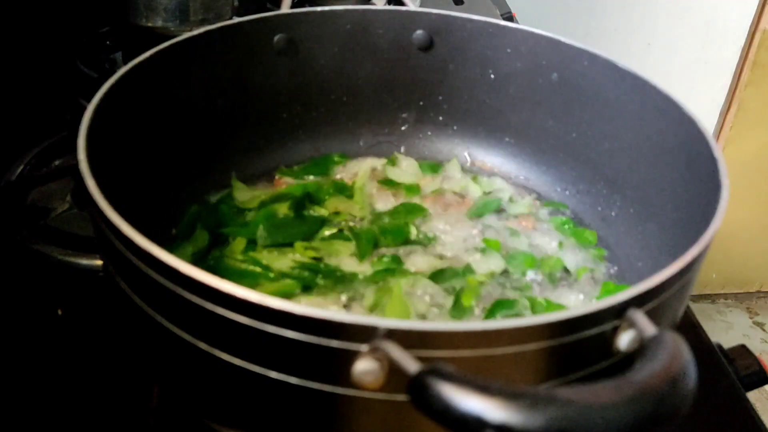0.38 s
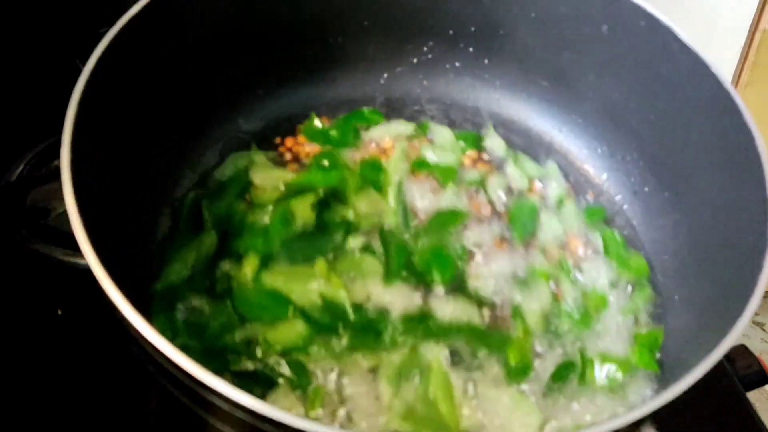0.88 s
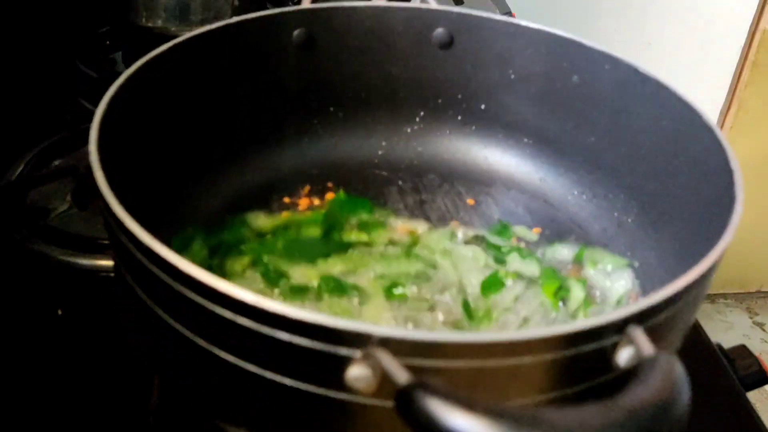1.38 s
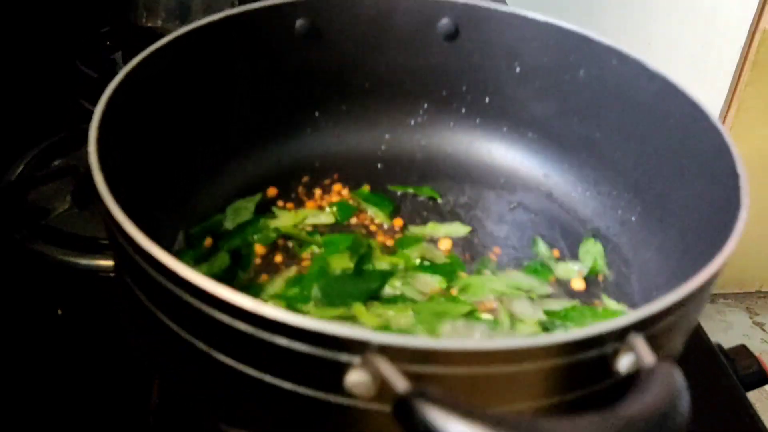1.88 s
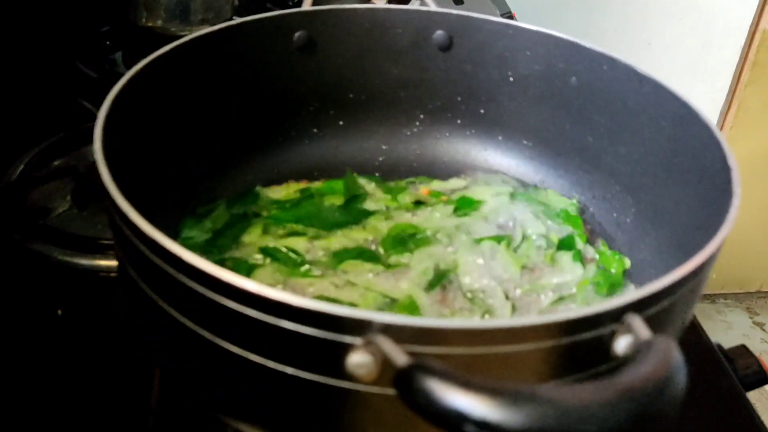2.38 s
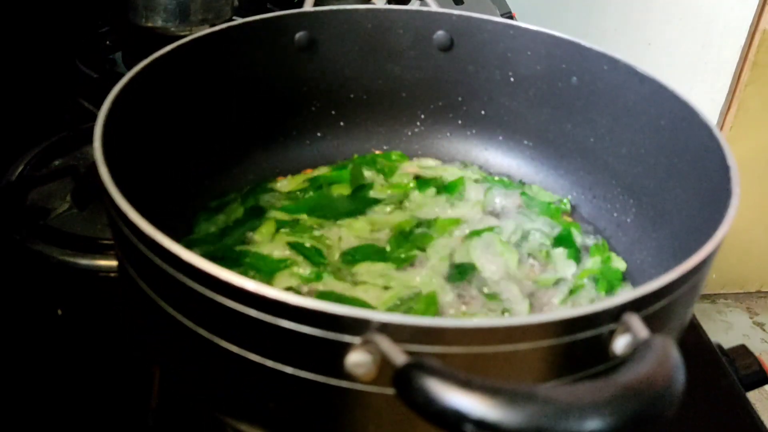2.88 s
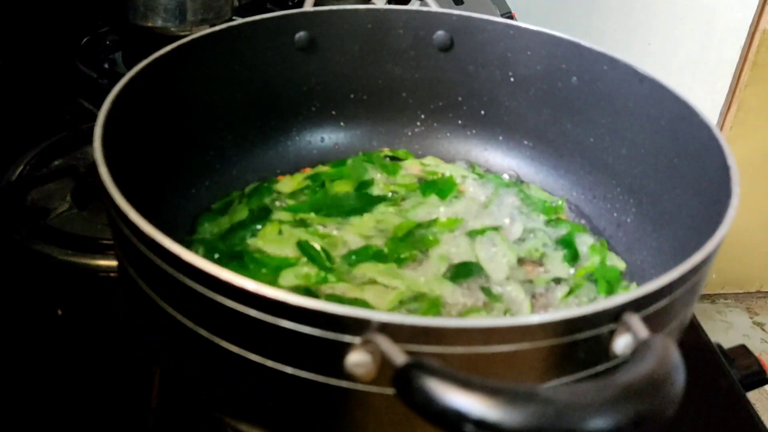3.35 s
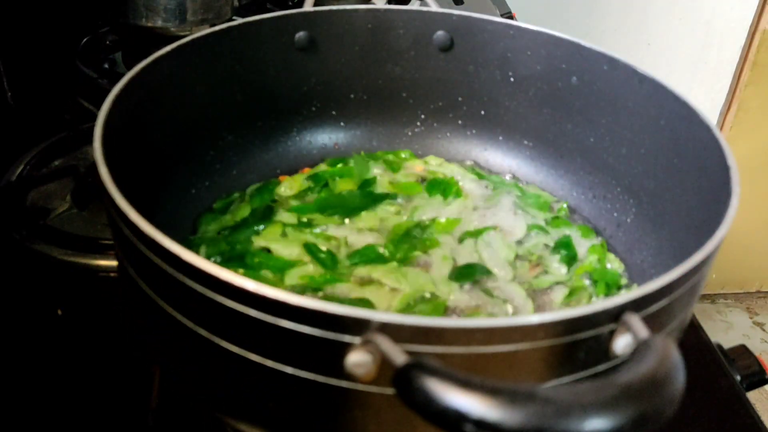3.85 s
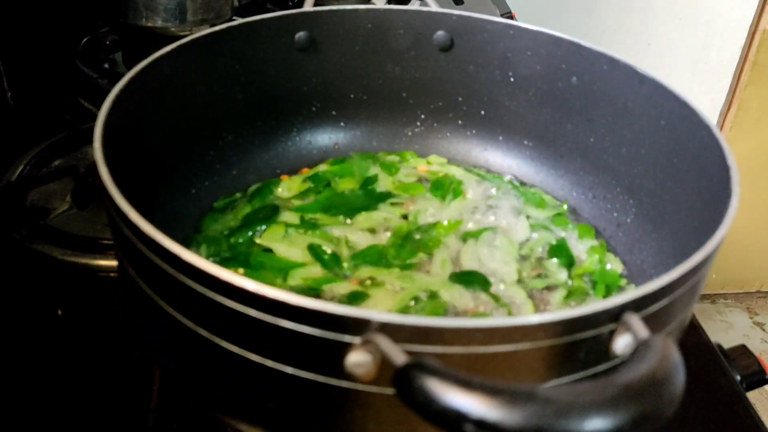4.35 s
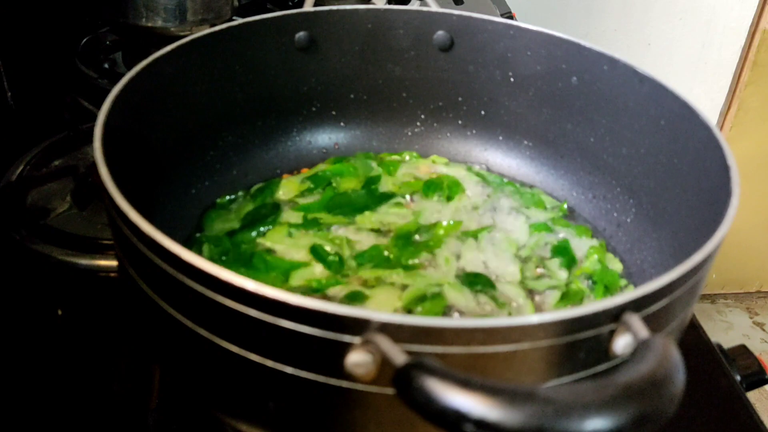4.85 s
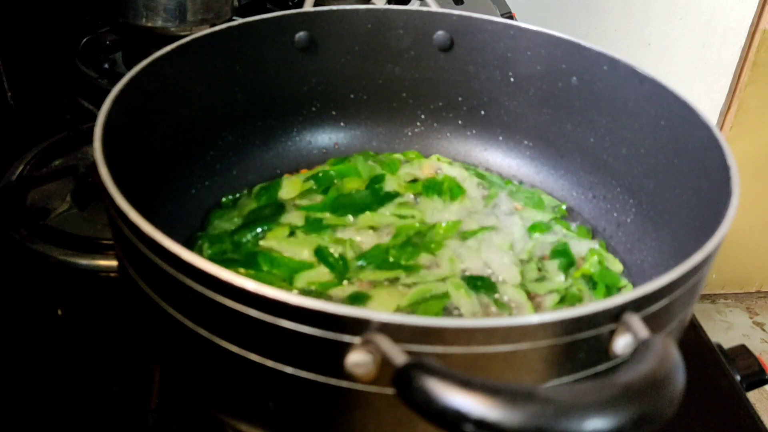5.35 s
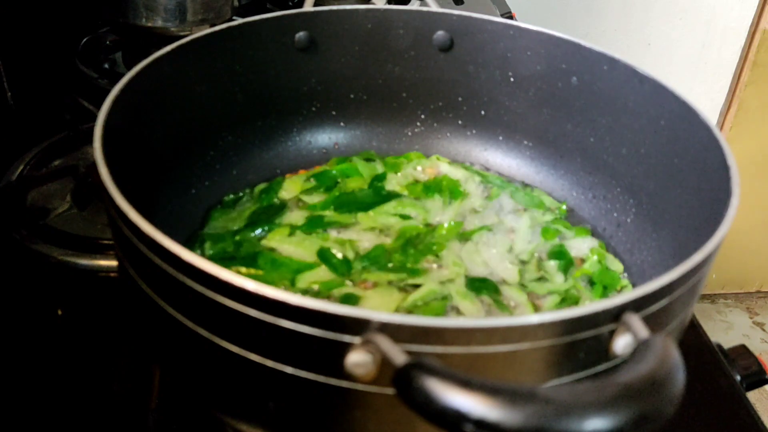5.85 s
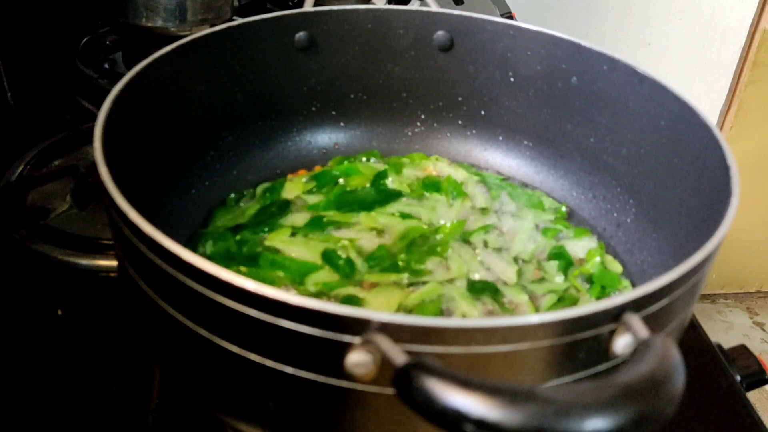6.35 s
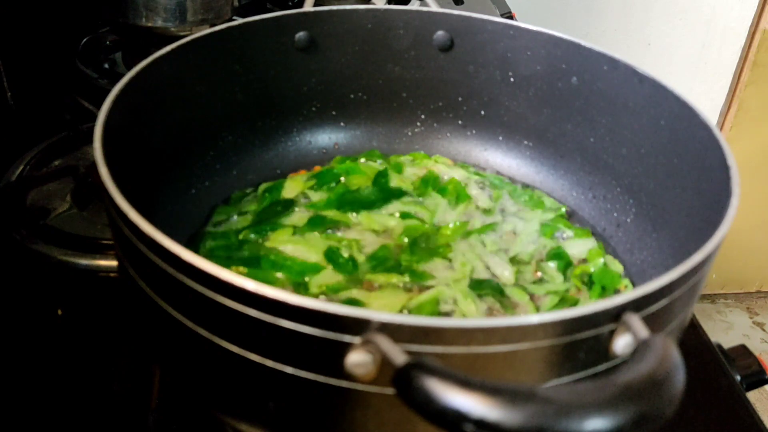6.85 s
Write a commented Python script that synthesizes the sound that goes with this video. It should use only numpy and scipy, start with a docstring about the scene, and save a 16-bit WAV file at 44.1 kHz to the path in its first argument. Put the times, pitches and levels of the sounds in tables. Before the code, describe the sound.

Close, bright frying hiss full of snapping water pops, flaring as a pan of leaves is shaken, later easing with several hard metallic stove-top knocks.

```python
"""Leaves fry in hot oil in a deep metal pan in a kitchen, heard close by on a two-port microphone. The sizzle
is dense clicks of steam, coloured by the microphone; its level wavers unevenly from band to band. Bubbles,
plops, water pops and oil ticks are short rings with diffuse tails; shaken leaves rustle. Knocks and drags
excite decaying modes of the stove top. Under it all lies a low murmur, noise from burner and room, nearly alike
at both ports between 80 and 200 Hz."""
import sys
import numpy as np
from scipy import signal
from scipy.fft import irfft
from scipy.io import wavfile
from scipy.ndimage import uniform_filter1d

SR = 44100
rng = np.random.default_rng(int(sys.argv[2]) if len(sys.argv) > 2 else 0)


def to_wav(s):
    """Save 16-bit WAV."""
    ch = np.atleast_2d(s).T  # columns
    pcm = np.round(np.clip(ch, -1, 1) * 32767)  # PCM
    wavfile.write(sys.argv[1], SR, pcm.astype(np.int16))


def decibels_to_gain(level_db):
    """Convert a level in decibels to a linear amplitude gain (20 dB per decade)."""
    exponent = np.asarray(level_db, float) / 20
    return 10 ** exponent


N = 318843  # samples

# Spectrum of the room murmur. Each row: frequency in Hz, relative level in dB.
MURMUR_SPECTRUM = [(12, -39), (20, 3), (54, -7.5), (96, 3.5), (129, -5.5), (166, 7), (215, 0), (335, 0.5),
                   (381, -3), (507, -1), (558, -22), (900, 0), (1170, -49), (1980, -120)]
MURMUR_DB = -48  # rms
# How alike the murmur is at the two ports. Each row: frequency in Hz, likeness from 0 to 1.
MURMUR_LIKENESS = [(30, 0.53), (80, 1), (200, 1), (450, 0.68), (900, 0.47)]

# Modes of the stove top. Each row: frequency in Hz before a small random shift, relative level in dB,
# time to fall 60 dB in seconds before it is held within 0.05 to 0.3.
STOVE_MODES = [(156, -18, 0.61), (207.8, -17, 0.28), (300.6, -18.5, 0.21), (332.2, -11.5, 0.15),
               (436, -10.5, 0.21), (475, -24, 0.16), (512, -17, .3), (525, -9, .3), (582, -15, 0.15),
               (625, -12, .3), (685, -3, 0.19), (778, -3.5, 0.11), (870, -1, 0.059), (1110, -3, 0.05),
               (1150, -15, 0.25), (1175, -4, 0.077)]
MODE_SHIFT = 0.024  # random part of the frequency: the modes shift with where the pan presses
STOVE_LOW_HZ = 133  # the stove top radiates little below this
# Knocks on the stove top. Each row: time in seconds, peak in dB ahead of the low cut and room,
# centre of the blow in Hz, contact length in cycles.
KNOCKS = [(.242, -25.5, 940, 5), (.299, -23.5, 860, 3.5), (0.955, -18, 393, 2), (.966, -33, 700, 1.5),
          (1.584, -29, 604, 2.7), (1.707, -16.5, 333, 1.13), (1.73, -27, 710, 4.5), (2.047, -20, 830, 3.9),
          (2.156, -22, 990, 1.3), (2.161, -19.5, 805, 3.1), (3.83, -23.5, 199, 1.2), (3.859, -30, 162, 5.1),
          (4.26, -31.5, 175, 3.5), (4.622, -28, 450, 4.8), (4.63, -19.5, 280, 4.4),
          (4.815, -18.5, 285, 4.6), (4.887, -13, 260, 2.4), (4.892, -18, 278, 4.4), (4.895, -17, 564, 13.6),
          (5.451, -19.5, 286, 5.6), (5.462, -23, 650, 3), (5.557, -30.5, 340, 10), (5.58, -10.5, 462, 11.4),
          (5.595, -2.5, 535, 1.55), (5.605, -10.5, 448, 12.7), (5.908, -19.5, 704, 1.76)]
BREADTH_OCTAVES, BREADTH_FALL = 2.47, 0.3  # a longer contact excites a narrower band
CLATTER_UP = 0.41  # reach above the blow, as a share of the reach below it
# Drags over the stove top. Each row: start in seconds, length in seconds, start level in dB,
# end level in dB, centre in Hz, which sets the share of low and high modes.
DRAGS = [(1.562, 0.092, -47, -51, 600), (0.98, 0.095, -31, -44.5, 330), (1.723, 0.13, -36, -45, 320),
         (4.769, 0.16, -31.5, -25.5, 217), (4.902, 0.12, -36, -42, 260), (5.022, 0.12, -32, -49, 150),
         (5.625, 0.15, -23.5, -42, 320), (5.62, 0.35, -41, -41.5, 150), (5.842, 0.082, -39, -46, 430)]

# Wet leaves sliding over the shaken pan. Each row: start in seconds, length in seconds,
# start level in dB, end level in dB, centre in Hz.
RUSTLES = [(.24, 0.091, -40, -32, 940), (0.947, 0.091, -32, -43, 895), (1.555, 0.13, -39, -37, 1320),
           (1.703, 0.1, -26, -42, 1120), (2.035, 0.1, -38, -37, 1270), (2.142, .13, -28.5, -56, 955)]
RUSTLE_OCTAVES = 0.81  # either side of the centre
# Oil spitting against the pan wall. Each row: time in seconds, peak in dB ahead of the tail, ring in Hz.
TICKS = [(.77, -21, 1500), (.968, -17, 1250), (1.586, -12, 1510), (1.741, -25, 1500), (1.758, -15, 1400),
         (2.137, -12, 2400), (3.465, -11, 2390), (3.679, -22, 2360), (4.131, -23, 1300), (4.261, -19, 2060),
         (4.455, -19, 2430), (4.886, -14, 1650), (5.1, -19, 1890), (5.311, -22, 2230), (5.345, -23, 2340),
         (5.412, -20, 1300), (5.525, -23, 2370), (5.551, -27, 2040), (5.782, -29, 1890),
         (5.82, -22.5, 1840), (5.907, -14.5, 2750), (6.191, -24, 1920), (6.36, -22, 2390),
         (6.594, -23, 1980), (6.643, -18.5, 1660), (6.711, -12.5, 1800), (6.79, -18.5, 2960),
         (6.906, -15.5, 1290), (7.003, -20, 2660), (7.194, -26, 1280)]
TICK_CYCLES = 5.7  # to fall 60 dB
# Large bubbles. Each row: time in seconds, level of the ring in dB, starting pitch in Hz.
PLOPS = [(0.815, -18.5, 1470), (0.879, -24, 1260), (0.9153, -23.5, 1490), (0.954, -22, 1220),
         (.985, -26, 1500), (1.002, -21, 2230), (1.128, -23, 2480), (1.168, -22, 2380),
         (1.311, -20.5, 2400), (1.42, -16, 2420), (1.5627, -17.5, 1300), (1.571, -17, 1350),
         (1.706, -16, 1195), (1.714, -14, 1660), (2.032, -24, 1550), (2.047, -13, 2260), (2.108, -20, 2440),
         (2.205, -25, 2560), (2.293, -24, 2470), (2.38, -17.5, 2370), (2.488, -16, 2370),
         (2.6075, -29, 2400), (2.9092, -19.5, 2350), (2.9711, -21, 2240), (5.1624, -22, 2300),
         (5.46, -27, 1840), (6.714, -31, 1870)]
PLOP_CYCLES, PLOP_SNAP_DB = 13, 0  # cycles to fall 60 dB; snap of the breaking film against the ring

# Drops of water bursting. Each row: time in seconds, peak in dB before panning, echoes and tail,
# ring in Hz, left minus right in dB.
POPS = [(0.0348, -5.5, 8560, -8), (0.156, -12, 7820, 0), (.162, -16, 7900, -4), (.17, -10, 7800, -4),
        (.209, -9, 7950, -1), (0.25, -7, 8030, -3.0), (.343, -21, 8000, -4), (0.537, -15, 8050, -4),
        (.625, -6, 7800, -15.5), (0.9288, -22, 7960, -4.5), (0.9567, -7.5, 8300, -8), (1.231, -9, 7360, -6),
        (1.239, -5.5, 8100, -10), (1.343, -20, 7770, -7), (1.498, -2, 7740, -1), (1.556, -21, 7800, -4),
        (1.612, -11, 8300, 9), (1.614, -8, 8900, 4), (1.651, -17, 7800, -4), (1.6796, -17, 7650, -4.0),
        (1.704, -3.5, 8140, -7), (1.8158, -12, 7660, -3), (1.8282, -9, 7800, -8), (2.0821, -3, 7600, -9),
        (2.1051, -8, 7790, 0), (2.231, -5, 7800, -7), (2.2752, -2, 7870, -7), (2.4773, -7, 8140, 10),
        (2.5146, -12, 7650, -2), (2.609, -19, 7540, -3.5), (2.754, -7, 7660, 1), (2.8094, -8, 7520, -2.0),
        (2.8938, -7, 8000, -5.5), (3.151, -2.5, 7900, -5), (3.2904, -11, 7750, -8), (3.36, -15, 7190, -9),
        (3.4515, -9.5, 8100, -5.0), (3.5505, -5, 7900, -3.0), (3.7953, -21, 8000, -2),
        (3.8097, -4.5, 8000, -8), (3.815, -10, 8000, -4), (3.819, -9, 7900, -4), (3.824, -11, 8100, -4),
        (3.882, -12, 7900, -4.5), (3.9028, -1.5, 8000, 1), (3.95, -16, 7790, -8), (4.0485, -1.5, 7400, -1),
        (4.223, -13, 8300, -1.5), (4.239, -6.5, 8050, -4), (4.3984, -16, 7670, -2), (4.43, -15, 7760, -4),
        (4.5172, -5.5, 7940, -6), (4.589, -11, 8300, -2), (4.7547, -20, 7720, -4), (4.879, -4, 7600, -10),
        (4.9742, -12, 8000, -8), (5.3488, -11, 7900, -8), (5.381, -11, 7240, -13), (5.5903, -9, 7400, -11),
        (5.7793, -19, 7970, -13), (5.793, -16, 7800, -13), (5.908, -11, 7300, -12),
        (5.9893, -14.5, 7400, -12), (6.134, -12.5, 7600, -8), (6.1629, -13, 7640, -13),
        (6.6444, -26, 8120, -5), (6.747, -16.5, 7900, -16), (6.8454, -20, 8640, -5),
        (6.979, -17, 7300, -13), (6.994, -11.5, 7400, -11)]
# Echoes off the pan wall. Each row: delay in seconds, level in dB.
PAN_ECHOES = [(.0019, -35), (.0031, -33)]
SPUTTER_S, SPUTTER_DB = 0.0043, -18  # spread in time of the smaller bursts after a pop; their level
CRACK_DB = -24  # sharpest edge of a pop, against its ring
SPLASH_S, SPLASH_DB = 0.0011, -11  # time scale and level of the fine spray around a pop

# Course of the frying: it flares when shaken, then dies down.
# Each row: time in seconds, mean sizzle level in dB, mean bubbling level in dB.
FRY = [(0.0, -24, -37), (0.5, -21.5, -39), (0.9, -23, -39), (1.3, -22, -47), (1.55, -19, -41),
       (1.8, -23, -34), (2.05, -22.5, -34), (2.3, -22.5, -33), (2.55, -23.5, -33.5), (3.15, -24, -38),
       (3.9, -26, -40), (4.6, -26.5, -42.5), (5.2, -28.5, -43.5), (5.7, -28, -38.5), (6.2, -29.5, -47.5),
       (6.7, -30, -41.5), (7.23, -30, -49)]
PAN_HZ, PAN_BUBBLES_DB = 2350, 18.5  # bubbles near the pan's hollow ring sound louder
BUBBLES_SURGE_DB = 0.5  # slow surges of the bubbling, rms
# Sizzle as the microphone colours it. Each row: frequency in Hz, relative level in dB per Hz.
SIZZLE = [(300, -29), (520, -10.5), (1000, -10.5), (1300, -8), (1900, -7.5), (2350, -5), (2900, -6),
          (3400, -7), (4600, -9), (6000, -6), (6800, -3.5), (7500, 4.5), (8500, 2.5), (9300, -7),
          (10100, -19.5), (12500, -26.5), (15600, -28.5), (16100, -50)]
# Tilt of the sizzle between the ports. Each row: frequency in Hz, left minus right in dB.
LEAN = [(400, 5), (1200, 1), (3300, -0.5), (5500, -4), (7500, -7), (9000, 2), (11000, -0.5), (15000, -2)]
FLURRY_S, FLURRY_DB = 0.0028, 1.5  # time scale and energy of a flurry, against its sharpest click
# Uneven level of the hiss, wavering from band to band over time. Each row: frequency in Hz, rms depth in dB.
PATCHY = [(800, 2), (2300, 3), (4500, 4.5), (6200, 4), (7800, 0.5), (9200, 4), (10500, 5), (15000, 4)]


def evened(x):
    """Scales to rms 1."""
    return x / np.sqrt(np.mean(x ** 2) + 1e-20)


def read(points, hz):
    """Reads a spectrum on a log-frequency axis."""
    f, value = np.transpose(points)
    return np.interp(np.log(hz + 1), np.log(f + 1), value)


def curve(rows, column):
    """One column of a table, sample by sample."""
    rows = np.array(rows)
    return np.interp(np.arange(N) / SR, rows[:, 0], rows[:, column])


def add(mix, s, sound):
    """Mixes a sound in at time s, in place."""
    part = mix[..., max(round(s * SR), 0):][..., :sound.shape[-1]]
    part += sound[..., :part.shape[-1]]


def wander(per_s):
    """Slow random curve of rms 1 with per_s independent points a second."""
    count = int(N / SR * per_s) + 2
    return evened(signal.resample(rng.standard_normal(count), N))


def sparks(per_s, spread_db, size=N):
    """Clicks of either sign at random moments; most small, a few large."""
    when, big = rng.random((2, size))
    hit = 2 * abs(when - .5) < per_s / SR
    size_db = spread_db * np.minimum(-np.log(big[hit] + 1e-12), 5)
    out = np.zeros(size)
    out[hit] = np.sign(when[hit] - .5) * decibels_to_gain(size_db)
    return out


def ports(sound, pan_db, lag=5):
    """The left port hears the pan lag samples later; pan_db is left minus right."""
    gap = np.zeros(lag)
    both = np.array([np.r_[gap, sound], np.r_[sound, gap]])
    return both * decibels_to_gain(np.array([[pan_db / 2], [-pan_db / 2]]))


def burst(hz, rise_s, t60, glide):
    """A short ring with a soft start and a pitch gliding up by twice the glide share, peak 1."""
    t = np.arange(round(t60 * SR) + 8) / SR
    envelope = (1 - np.exp(-(t / rise_s) ** 2)) * decibels_to_gain(-60 * t / t60)
    ring = envelope * np.sin(2 * np.pi * hz * t * (1 + glide * t / t60))
    return ring / abs(ring).max()


def walls(x, t60, wet_db):
    """Adds a diffuse tail of sparse taps, different at each port, from 2 ms on."""
    t = np.arange(round(t60 * SR)) / SR
    taps = rng.choice([-1., 1.], (2, len(t))) * (rng.random((2, len(t))) < .1)
    tail = taps * decibels_to_gain(-60 * t / t60) * (t > .002)
    tail /= np.linalg.norm(tail, axis=1, keepdims=True)
    return x + decibels_to_gain(wet_db) * signal.oaconvolve(x, tail, axes=1)[:, :N]


def shaped(x, db):
    """Colours both ports by dB gains given on 1025 bins each, without delay."""
    taps = np.fft.fftshift(irfft(decibels_to_gain(db), axis=1), axes=1) * signal.windows.hann(2048)
    return signal.oaconvolve(x, taps, "same", axes=1)


def octave_band(order, hz, down, up):
    """Band-pass filter reaching so many octaves down and up from hz."""
    return signal.butter(order, hz * 2. ** np.array([-down, up]), "bandpass", fs=SR, output="sos")


def kitchen():
    """Low murmur of burner and room: noise of partly shared phase at the ports, drifting in patches."""
    hz = np.fft.rfftfreq(2048, 1 / SR)
    a, b, c, d, patches = rng.standard_normal((N // 512 + 5, len(hz), 5)).T
    patches = evened(uniform_filter1d(uniform_filter1d(patches, 8, 0), 8, 1))
    same = np.clip(read(MURMUR_LIKENESS, hz), -1, 1)[:, None]
    left, other = a + 1j * b, c + 1j * d
    z = np.array([left, same * left + np.sqrt(1 - same ** 2) * other])
    z *= decibels_to_gain(read(MURMUR_SPECTRUM, hz)[:, None] + 2.6 * patches)
    murmur = signal.istft(z, nperseg=2048, noverlap=1536)[1][:, :N]
    return decibels_to_gain(MURMUR_DB) * evened(murmur)


def stove_ring(centre_hz, octaves):
    """The decaying modes of the stove top, favoured near the centre of the blow."""
    hz, db, t60 = np.transpose(STOVE_MODES)[:, :, None]
    hz = hz * (1 + MODE_SHIFT * rng.standard_normal(hz.shape))
    t = np.arange(SR // 3) / SR
    near_db = -6 * (np.log2(hz / centre_hz) / octaves) ** 2
    decay_db = -60 * t / np.clip(t60, .05, .3)
    return (decibels_to_gain(db + near_db + decay_db) * np.sin(2 * np.pi * hz * t)).sum(0)


def knocks():
    """A push of some milliseconds sets the stove top ringing and clatters on briefly."""
    out, t = np.zeros(N), np.arange(6000) / SR
    for s, db, hz, cycles in KNOCKS:
        contact_s, octaves = cycles / hz, BREADTH_OCTAVES * cycles ** -BREADTH_FALL
        push = signal.windows.hann(max(round(contact_s * SR), 8))
        thud = push * np.sin(2 * np.pi * hz * t[:len(push)])
        knock = signal.fftconvolve(thud, stove_ring(hz, octaves))
        knock = knock / abs(knock).max()
        band = octave_band(3, hz, octaves, CLATTER_UP * octaves)
        rough = evened(signal.sosfilt(band, rng.standard_normal(len(t))))
        clatter = rough * (1 - np.exp(-2 * t / contact_s)) * decibels_to_gain(-60 * t / 0.14)
        add(knock, 0, 1.2 * thud)
        add(knock, 0, 0.49 * clatter)
        add(out, s - .002, decibels_to_gain(db) * knock / abs(knock).max())
    return out


def drags():
    """Uneven slips feed the same modes for the length of a stroke."""
    out = np.zeros(N)
    for s, length, start_db, end_db, hz in DRAGS:
        part = np.arange(0, length, 1 / SR) / length
        low = np.clip((2 - np.log2(hz / 150)) / 2, 0, 1)  # share on the low modes
        slips = sparks(400, 3.5, size=20000)[:len(part)]
        rub = np.zeros(len(part))
        for centre_hz, share in ((200, low), (560, 1 - low)):
            ringing = signal.fftconvolve(slips, stove_ring(centre_hz, 0.98))[:len(part)]
            rub += share * evened(ringing)
        level = decibels_to_gain(start_db + (end_db - start_db) * part)
        add(out, s, level * evened(rub) * signal.windows.tukey(len(part), .15))
    return out


def stove():
    """Knocks and drags lose their lows at the stove top and gain a diffuse tail."""
    thin = signal.butter(3, STOVE_LOW_HZ, "highpass", fs=SR, output="sos")
    struck = signal.sosfilt(thin, knocks() + drags())
    return walls(ports(struck, 1.8, lag=0), .2, -8.0)


def rustles():
    """Sliding wet leaves make dense little scuffs and splashes over a wide band."""
    out = np.zeros((2, N))
    for s, length, start_db, end_db, hz in RUSTLES:
        part = np.arange(0, length, 1 / SR) / length
        band = octave_band(2, hz, RUSTLE_OCTAVES, RUSTLE_OCTAVES)
        scuffs = evened(signal.sosfilt(band, sparks(650, 4.5, size=6000)))[:len(part)]
        level = decibels_to_gain(start_db + (end_db - start_db) * part)
        add(out, s, ports(level * scuffs * signal.windows.tukey(len(part), .15), 0))
    return walls(out, .06, 0)


def ticks():
    """Oil hits the pan wall: a tick is only a few cycles long, so it spreads wide in pitch."""
    out = np.zeros((2, N))
    for s, db, hz in TICKS:
        tick = burst(hz, 0.44 / hz, TICK_CYCLES / hz, 0.00022)
        add(out, s - .0005, decibels_to_gain(db) * ports(tick, 0))
    return walls(out, 0.03, 2)


def plops():
    """Large bubbles: the film snaps over a longer, lower ring that rises slightly."""
    out = np.zeros((2, N))
    for s, db, hz in PLOPS:
        plop = burst(hz, 2.8 / hz, PLOP_CYCLES / hz, 0.025)
        add(plop, 0, decibels_to_gain(PLOP_SNAP_DB) * burst(1.27 * hz, 0.43 / hz, 2.1 / hz, 0))
        add(out, s - .001, decibels_to_gain(db) * ports(plop, 1.1 * rng.standard_normal()))
    return walls(out, .04, -1)


def pops():
    """Each pop rings the microphone's treble peak with click and spray, sputters, and echoes in the pan."""
    out, t = np.zeros((2, N)), np.arange(-90, 130) / SR
    treble = signal.butter(2, [5600, 9800], "bandpass", fs=SR, output="sos")
    ring_envelope = np.exp(-(t / np.where(t < 0, .00026, .00034)) ** 2)
    click = np.exp(-(t / 0.000087) ** 2) * np.sin(2 * np.pi * 4200 * t)
    crack = np.exp(-(t / 0.000089) ** 2) * np.cos(2 * np.pi * 11000 * t)
    for s, db, hz, pan_db in POPS:
        ring = ring_envelope * np.cos(2 * np.pi * hz * t)
        spray = rng.standard_normal(len(t)) * np.exp(-(t / SPLASH_S) ** 2)
        spray = signal.sosfilt(treble, spray)
        pop = ring + decibels_to_gain(-3) * click + decibels_to_gain(CRACK_DB) * crack
        pop += decibels_to_gain(SPLASH_DB) * spray / abs(spray).max()
        pop = decibels_to_gain(db) * ports(pop / abs(pop).max(), pan_db)
        add(out, s - .001, pop)
        for later in rng.standard_normal(3):
            add(out, s + 0.0039 + SPUTTER_S * abs(later), decibels_to_gain(SPUTTER_DB) * pop)
    direct = out.copy()
    for delay_s, db in PAN_ECHOES:
        add(out, delay_s, decibels_to_gain(db) * direct)
    return walls(out, 0.018, -3.5)


def bubbling():
    """Small bubbles break at the surface, each a few rising cycles; the pan favours its own pitch."""
    out = np.zeros((2, N))
    for hz in np.geomspace(1050, 2900, 9):
        pan_lift_db = PAN_BUBBLES_DB * np.exp(-(np.log(hz / PAN_HZ) / 0.22) ** 2)
        bubble = burst(hz, 1.85 / hz, 9 / hz, 0.037) * decibels_to_gain(pan_lift_db)
        bubbles = signal.oaconvolve(sparks(80, 3.1), bubble)
        out += ports(bubbles, rng.uniform(-7.0, 6.4), rng.integers(2, 9))[:, :N]
    level_db = curve(FRY, 2) + BUBBLES_SURGE_DB * wander(2.8)
    return decibels_to_gain(level_db) * evened(walls(out, 0.068, -4))


def crackle(per_s, spread_db, clumps_db, fine_db):
    """Tiny steam bursts from six spots on the oil, each with its own lag between the ports."""
    out, t = np.zeros((2, N)), np.arange(-400, 401) / SR
    for lag in (2, 4, 5, 5, 6, 8):  # samples
        busy = decibels_to_gain(clumps_db * wander(18))  # spots flare up in clumps
        flurry = rng.standard_normal((2, len(t))) * np.exp(-abs(t) / FLURRY_S)
        flurry = decibels_to_gain(FLURRY_DB) * flurry / np.linalg.norm(flurry, axis=1, keepdims=True)
        flurry = flurry + (t == 0)  # the sharpest click
        clicks = ports(sparks(per_s * busy, spread_db), 0, lag)[:, :N]
        out += signal.oaconvolve(clicks, flurry, "same", axes=1)
    fine = rng.standard_normal((2, N))  # bursts too fine to hear apart
    return evened(evened(out) + decibels_to_gain(fine_db) * fine)


def patchy(x):
    """Random gains over patches of some hundred Hz by some ten ms, the same at both ports."""
    hz, _, z = signal.stft(x, SR, nperseg=512, noverlap=384)
    patches = rng.standard_normal(z.shape[1:])
    patches = uniform_filter1d(patches, size=2, axis=0)
    patches = evened(uniform_filter1d(patches, size=20, axis=1))
    z = z * decibels_to_gain(read(PATCHY, hz)[:, None] * patches)
    return signal.istft(z, nperseg=512, noverlap=384)[1][:, :N]


def sizzle():
    """The smallest steam bursts fill the treble, larger ones the middle; they come independently."""
    hz = np.fft.rfftfreq(2048, 1 / SR)
    colour_db = read(SIZZLE, hz) + np.array([[.5], [-.5]]) * read(LEAN, hz)
    treble = 1 / (1 + (4300 / (hz + 1)) ** 6)  # shares of power
    top = 1 / (1 + (10300 / (hz + 1)) ** 16)
    air_db = colour_db + 10 * np.log10(top + 1e-9)
    high_db = colour_db + 10 * np.log10(treble * (1 - top) + 1e-9)
    middle_db = colour_db + 10 * np.log10(1 - treble + 1e-9)
    air = shaped(crackle(500, 3.1, 0.82, -18), air_db)
    high = shaped(crackle(500, 3.5, 1.4, -4), high_db)
    middle = shaped(crackle(300, 3.32, 2.6, -10), middle_db)
    level_db = curve(FRY, 1) + 0.57 * wander(9.8)
    return decibels_to_gain(level_db) * evened(patchy(air + high + middle))


def scene():
    """Room, stove top and frying, summed at the two ports."""
    background = kitchen() + stove()
    single_sounds = rustles() + ticks() + plops() + pops()
    return background + single_sounds + bubbling() + sizzle()


def band_limit(x):
    """A steep low-pass at the top of the band."""
    return signal.sosfilt(signal.butter(12, 15900, fs=SR, output="sos"), x)


def record(dry):
    """The microphone signal clips at full scale."""
    mix = np.clip(dry, -1, 1)
    return band_limit(mix)


dry = scene()
out = record(dry)
to_wav(out)
```